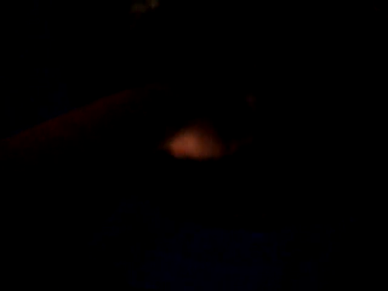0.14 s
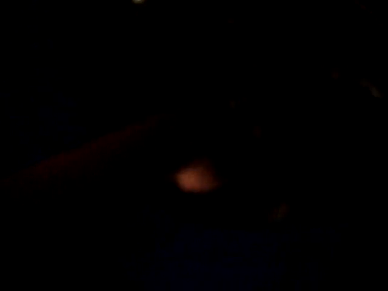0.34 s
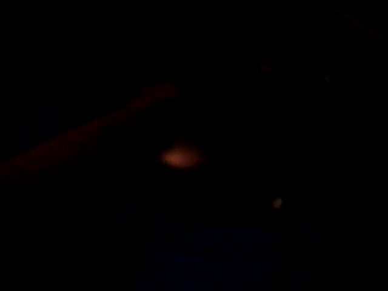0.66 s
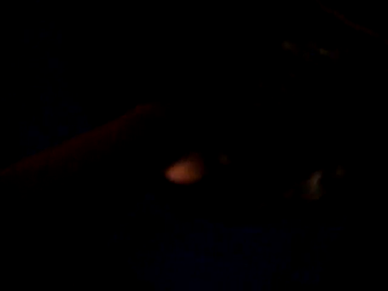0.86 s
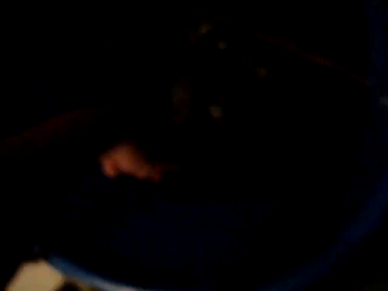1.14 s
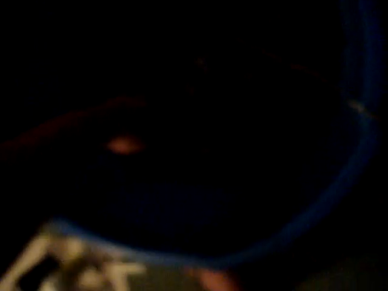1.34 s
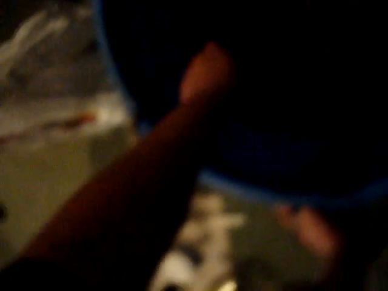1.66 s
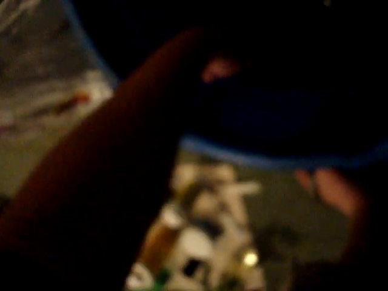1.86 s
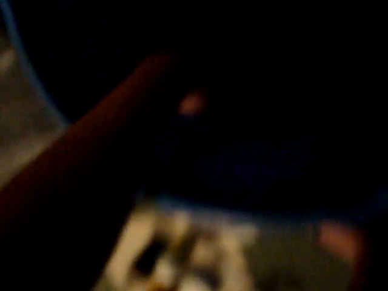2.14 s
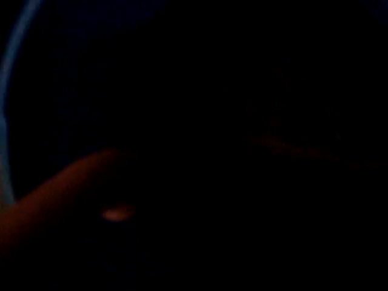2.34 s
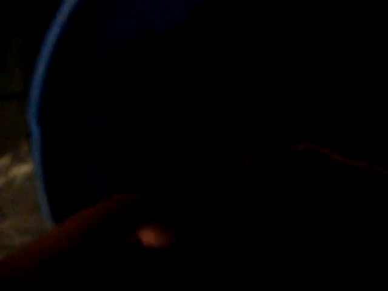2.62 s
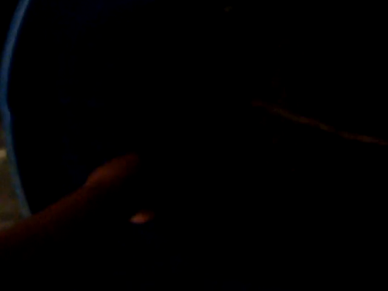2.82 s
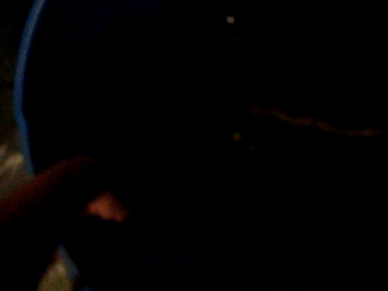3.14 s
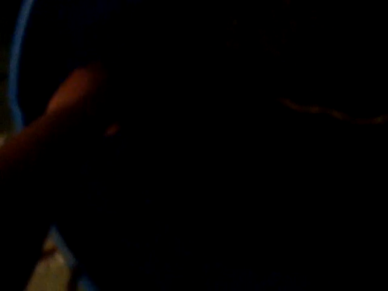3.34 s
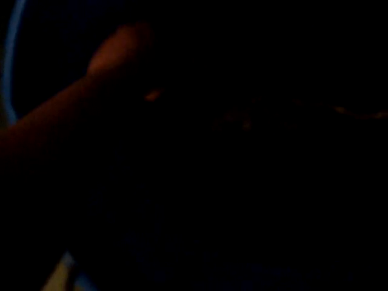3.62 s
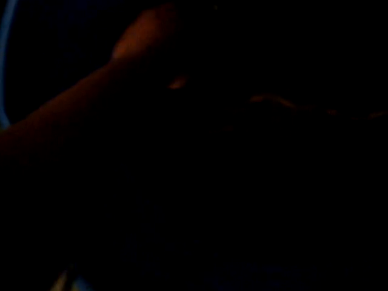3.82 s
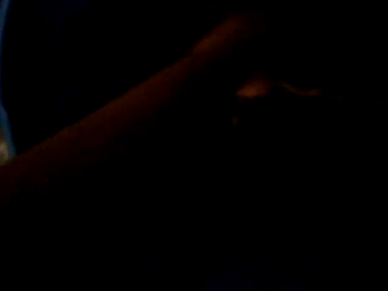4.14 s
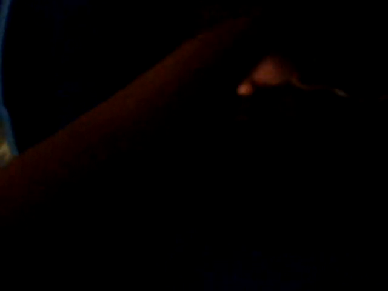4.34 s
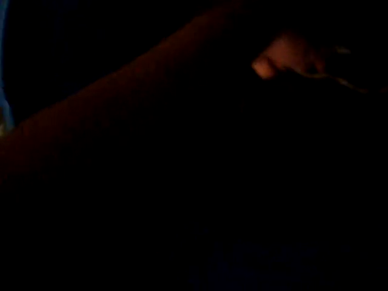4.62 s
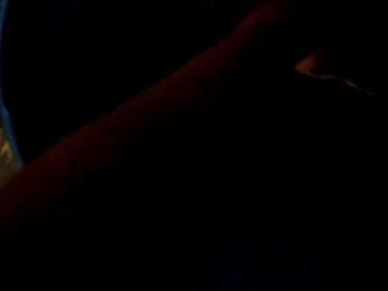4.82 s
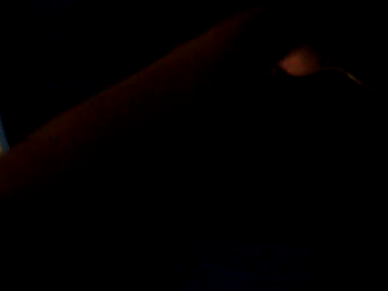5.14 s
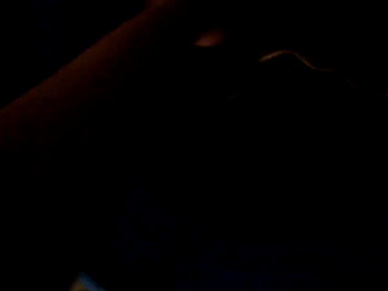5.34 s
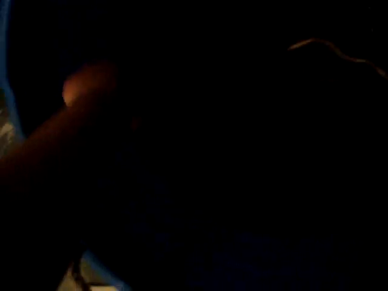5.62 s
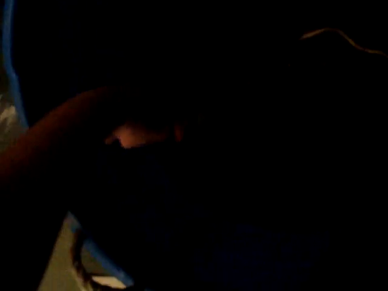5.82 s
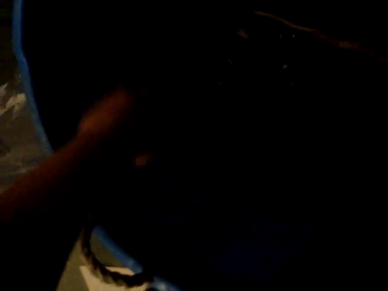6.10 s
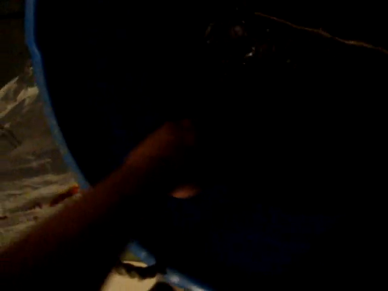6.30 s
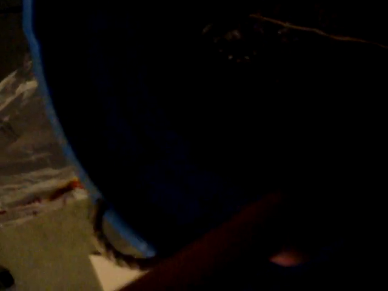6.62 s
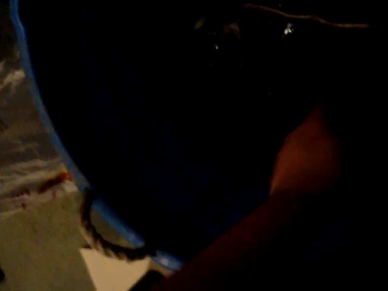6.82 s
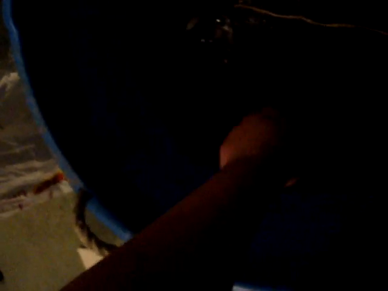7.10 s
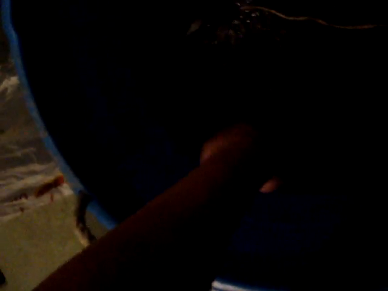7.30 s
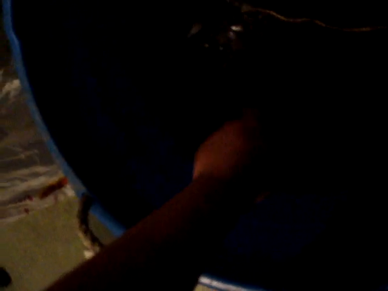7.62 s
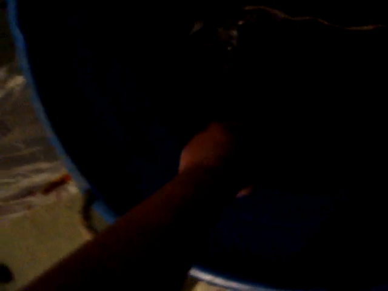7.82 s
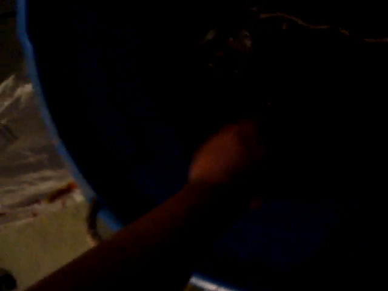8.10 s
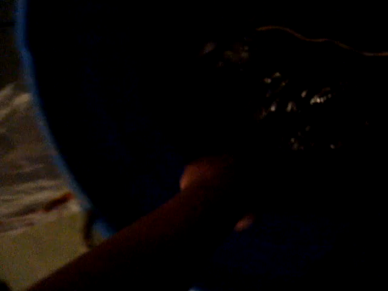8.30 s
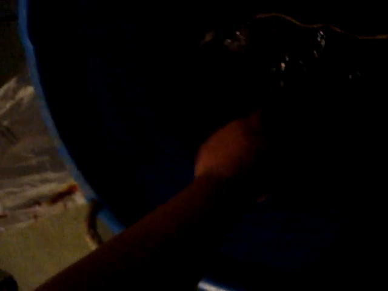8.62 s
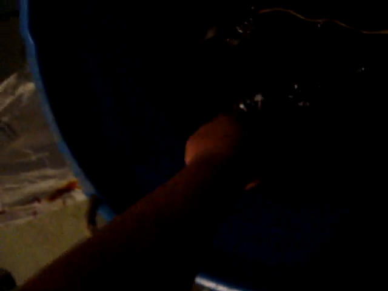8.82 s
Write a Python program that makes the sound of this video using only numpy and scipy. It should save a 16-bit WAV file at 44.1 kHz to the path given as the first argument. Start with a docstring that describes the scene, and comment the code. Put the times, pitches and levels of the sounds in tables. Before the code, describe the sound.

Water is worked by hand in a deep plastic tub, heard close with short hollow reflections. Irregular strokes gurgle, fizz and plop; wavelets slap. After a quieter passage, the wall is bumped repeatedly with woody-plastic knocks, low thuds and gulping air. A sparse pause follows, then lively, crowded sloshing over faint room air and hum.

```python
"""First a wash of stirred water, then a slap and a plop: a hand stirs a big plastic barrel, close by, in a small room.
Each stroke folds air into the water: clouds of decaying sines gurgle, splash and fizz over filtered noise.
Single bubbles plop with climbing pitch, eddies shed sweeping chains of them, wavelets slap as noise bursts.
The stirrer knocks on the wall (noise and decaying modes), trapped air gulps, and the barrel thuds on hard pushes.
Behind it lie the barrel's soft drone (resonant noise), room air and a faint mains hum."""
import sys
import numpy as np
from scipy import signal
from scipy.fft import rfft, irfft, next_fast_len
from scipy.io import wavfile
from scipy.ndimage import uniform_filter1d, map_coordinates

SR = 44100
rng = np.random.default_rng(int(sys.argv[2]) if len(sys.argv) > 2 else 0)


def log_audio(samples):
    """Write samples as a 16-bit WAV file to the path given in sys.argv[1]."""
    # one column per channel
    frames = np.atleast_2d(samples).T
    # limit to full scale, then quantise
    limited = np.clip(frames, -1, 1)
    pcm = np.round(limited * 32767).astype(np.int16)
    wavfile.write(sys.argv[1], SR, pcm)


N = 394694  # length [samples]
# Levels in the tables and settings are relative: each function adds a trim for its own source.


def amp(db):
    """Decibels to gain."""
    return 10 ** (np.asarray(db) / 20)


def unit(x):
    """Scale to rms 1."""
    return x / np.sqrt(np.mean(x ** 2) + 1e-20)


def along(points, hz):
    """Interpolate (frequency [Hz], value) points on a log frequency axis."""
    point_hz, value = np.transpose(points)
    return np.interp(np.log(hz + 1), np.log(point_hz + 1), value)


def curves(rows):
    """One value per sample for each column after the time."""
    s, *columns = np.transpose(rows)
    return [np.interp(np.arange(N) / SR, s, column) for column in columns]


def filtered(x, response):
    """Multiply the spectrum of x by a response of frequency."""
    size = next_fast_len(len(x) + SR // 2)
    spectrum = rfft(x, size) * response(np.fft.rfftfreq(size, 1 / SR))
    return irfft(spectrum, size)[:len(x)]


def resonance(f, hz, width):
    """Causal response of one mode."""
    return 1j * f * width / (hz * hz - f * f + 1j * f * width)


def band_noise(size, lo_hz, hi_hz):
    """Noise of rms 1 between two soft edges."""
    sos = signal.butter(3, [lo_hz, min(hi_hz, SR / 2 - 1)], "band", fs=SR, output="sos")
    return unit(signal.sosfilt(sos, rng.standard_normal(size)))


def wobble(rate, size=N):
    """A smooth random curve, rate knots a second."""
    knots = rng.standard_normal(int(size * rate / SR) + 4)
    return map_coordinates(knots, [np.arange(size) * rate / SR])


def add(track, s, sound):
    """Mix a sound into a track at time s."""
    start = max(round(s * SR), 0)
    part = track[start:start + len(sound)]
    part += sound[:len(part)]


def bubble(age, hz, cycles, rise, onset):
    """An air pocket rings down 40 dB over some cycles; its pitch climbs as it nears the surface."""
    turns = age * hz
    life = turns / cycles
    tone = np.sin(2 * np.pi * turns * (1 + rise * life / 2))
    return tone * np.exp(-np.log(100) * life) * (1 - np.exp(-turns / onset))


# quiet room air at the microphone: (frequency [Hz], relative density [dB per Hz])
ROOM_AIR = [(25, -32), (60, -12.5), (95, -15.5), (150, -4), (250, 2.5), (380, 0.5), (480, 6), (600, 0.5),
            (980, 4), (1500, -3), (3000, -12.5), (6000, -25), (10000, -29)]


def background():
    """Room air is noise shaped over frequency; mains hum is one steady sine."""
    air = unit(filtered(rng.standard_normal(N), lambda f: amp(along(ROOM_AIR, f))))
    hum = np.sin(2 * np.pi * 120 * np.arange(N) / SR)
    return amp(-48) * air + amp(-64.5) * hum


DRONE_WAVER_S = 0.00405  # drifting path that makes the drone's pitch waver
# the barrel's low drone while the water turns: (time [s], level [dB])
DRONE = [(0.0, -48.5), (0.6, -45), (1.5, -43.5), (1.62, -38.5), (1.79, -33.5), (1.87, -42), (1.93, -38),
         (2.06, -51), (2.15, -44), (2.25, -35.5), (2.39, -45), (2.5, -40.5), (2.8, -44), (2.94, -37),
         (3.03, -30), (3.12, -44), (4.3, -56), (5.4, -50), (5.6, -34), (5.92, -58.5), (7.5, -64),
         (8.4, -60), (8.95, -56)]


def drone():
    """Two low resonances of the barrel, kept going by the turning water and wavering with it."""
    level_db, = curves(DRONE)

    def response(f):
        return resonance(f, 247.7, 47) ** 2 + amp(-10) * resonance(f, 477, 110) ** 2

    tone = filtered(rng.standard_normal(N), response)
    path = DRONE_WAVER_S * SR * wobble(7)
    tone = map_coordinates(tone, [np.arange(N) + path], order=1)
    return amp(level_db - 6.5) * unit(tone)


# decay of the small room: (frequency [Hz], time to fall 60 dB [s])
ROOM_DECAY = [(150, 0.13), (1000, 0.57), (3000, 0.067), (10000, 0.011)]


def room(x):
    """A short diffuse tail, the top dying first; its pattern changes as hand and microphone move."""
    track = np.zeros(N)
    for start in range(0, N, SR // 5):  # a new tail five times a second
        hz, t, z = signal.stft(rng.standard_normal(SR // 3), SR, nperseg=256)
        decay = amp(-60 * t / along(ROOM_DECAY, hz)[:, None])
        tail = signal.istft(z * decay, SR, nperseg=256)[1]
        reverb = signal.fftconvolve(x[start:start + SR // 5], tail / np.linalg.norm(tail))
        add(track, start / SR + 0.00401, reverb)
    return track


def bounces(x, count):
    """Sound crosses the barrel and comes back several times, along paths that drift with the stirring."""
    n, track = np.arange(N), np.zeros(N)
    for k in range(1, count + 1):
        delay_s = k * 0.0035 + 0.000495 * wobble(3)
        track += amp(-2.0 - 10.2 * k) * map_coordinates(x, [n - delay_s * SR])
    return track


# air space above the water: (frequency [Hz], width [Hz], level [dB])
CAVITY_MODES = [(490, 21, 2), (845, 23, -4.5), (978, 30, -5), (1085, 78, -8), (1236, 40, -1)]


def barrel(x):
    """The air space above the water rings along in its resonances."""
    def response(f):
        return sum(amp(db) * resonance(f, hz, width) for hz, width, db in CAVITY_MODES)

    return x + amp(1.5) * filtered(x, response)


# hard pushes jolt the whole barrel: (time [s], level [dB])
JOLTS = [(0.815, -53), (3.242, -50), (3.495, -55), (3.77, -63), (3.988, -56), (4.725, -55), (5.335, -61),
         (5.482, -64), (5.65, -53), (5.77, -56), (6.723, -58), (7.115, -64), (8.425, -51)]


def jolts():
    """The full barrel shifts with a dull, deep thud: low noise that dies fast."""
    track, t = np.zeros(N), np.arange(SR // 4) / SR
    for s, db in JOLTS:
        fall = (1 - np.exp(-t / .003)) * amp(db + 6 - 60 * t / .08)
        add(track, s, band_noise(len(t), 25, 100) * fall)
    return track


GULP_RISE = .08  # share by which the pitch has climbed once the ring is 40 dB down
# large pockets of trapped air: (time [s], level [dB], starting pitch [Hz], ring [cycles])
GULPS = [(1.922, -33, 500, 15), (2.215, -30, 600, 24), (2.998, -23, 230, 15), (3.255, -20, 282, 12),
         (3.272, -17, 520, 20), (3.497, -27, 478, 14), (3.503, -28.5, 295, 18), (3.778, -27, 420, 13),
         (3.781, -20, 262, 11), (3.994, -21, 232, 16), (4.0, -18.5, 356, 13), (4.594, -24, 290, 11),
         (4.741, -13, 275, 10), (5.016, -30.5, 520, 16), (5.339, -20, 264, 10), (5.356, -33, 520, 16),
         (5.488, -21, 320, 8.1), (5.573, -23, 592, 16), (5.578, -27.5, 295, 13), (5.662, -26, 520, 13),
         (5.687, -21, 286, 10), (5.777, -29, 260, 10), (5.8, -26, 280, 11), (6.743, -24, 310, 8.9),
         (6.757, -28, 534, 16), (6.768, -29, 234, 9.7), (7.128, -29, 210, 16), (7.916, -28, 580, 18),
         (7.92, -28, 275, 12), (8.385, -34.5, 475, 30), (8.69, -33, 283, 12)]


def gulps():
    """A large air pocket closes and rings low for a few cycles."""
    track, t = np.zeros(N), np.arange(SR // 6) / SR
    for s, db, hz, cycles in GULPS:
        add(track, s, amp(db + 4.5) * bubble(t, hz, cycles, rise=GULP_RISE, onset=1.4))
    return track


MODE_LOSS_DB_PER_S = 173  # upper modes die this much faster for each octave over the centre


def clatter(t, centre_hz, count):
    """The crowded upper modes of the wet wall, a new set for each place struck, with a little noise."""
    place, phase, strength = rng.random((3, count))
    octaves = 2.2 * ((np.arange(count) + place) / count - .5)
    gain = amp(11.7 * strength - 4.3 * octaves ** 2)
    damping = amp(-MODE_LOSS_DB_PER_S * np.maximum(octaves, 0)[:, None] * t)
    tones = np.sin(2 * np.pi * (centre_hz * 2 ** octaves[:, None] * t + phase[:, None]))
    modes = gain @ (damping * tones)
    return amp(-2.0) * modes / np.sqrt(np.sum(gain ** 2) / 2) + amp(-4) * band_noise(len(t), 710, 3400)


PLUNGE_S, PLUNGE_FALL = .06, 0.393  # length of the run; its last pitch over the clack centre, before scatter
PLUNGE_DB, PLUNGE_LOSS_DB = -6, 12.5  # first bubble over the clack level; loss by the last


def plunge(t, centre_hz, count):
    """A knock drags air under: a quick run of bubbles, ever weaker and on the whole larger and lower."""
    run = np.zeros(len(t))
    for k, (late, size) in enumerate(rng.random((count, 2))):
        depth = (k + late) / count
        hz = centre_hz * PLUNGE_FALL ** depth * np.exp(size - .5)
        ring = bubble(t, hz, cycles=22.4, rise=.1, onset=1.2)
        add(run, depth * PLUNGE_S, amp(-PLUNGE_LOSS_DB * depth) * ring)
    return run


CRACK_DB = -4  # the wet crack of first contact, over the clack level
KNOCK_UNEVEN_DB = 3  # water slops against the wall as it rings down
KNOCK_DETUNE = 0.0355  # water leaning on the wall shifts its modes: scatter in log pitch
WALL_BEND = .05  # moving water bends the modes while they ring: share of pitch
# the stirrer hits the wall: (time [s], boom level [dB], clack level [dB], snap level [dB],
# contact length [s], clack time to fall 60 dB [s], clack centre [Hz])
KNOCKS = [(3.241, -28, -13, -16.5, 0.012, 0.2, 1347), (3.495, -41, -16.5, -12.5, .011, .12, 1403),
          (3.767, -35.5, -22, -14.5, 0.0062, .15, 1245), (3.986, -31.5, -20, -15, 0.014, .12, 1267),
          (4.587, -35.5, -23, -36, 0.0074, 0.21, 1294), (4.725, -30.5, -18, -23, .004, .1, 1352),
          (5.335, -33.5, -18.5, -28, 0.0034, 0.088, 1440), (5.482, -34.5, -18, -17, 0.01, 0.087, 1220),
          (5.652, -33.5, -21, -9, 0.007, 0.072, 1714), (5.766, -37.5, -21, -12.5, 0.0048, 0.11, 1736),
          (6.723, -32, -14, -15, 0.011, .14, 1302), (7.116, -41, -19.5, -12, 0.0065, .11, 1145),
          (7.912, -46.5, -29, -42, .003, .1, 1220), (8.433, -51, -19, -17, 0.0014, .05, 1240),
          (8.69, -51, -26, -37, .0033, .1, 1310)]
# the barrel wall: (frequency [Hz], level [dB], time to fall 60 dB [s])
WALL_MODES = [(193, -7.5, 0.32), (223, -3.5, 0.27), (247, 1, 0.29), (281.8, -0.5, 0.24), (313.3, 4.5, 0.23),
              (379, -2, 0.27), (511, 5, 0.069), (705, -8, 0.18), (805, -14, 0.28), (1030, -20, 0.59),
              (1295, 11, 0.05)]


def knocks():
    """Bending waves in the plastic: treble first and dying unevenly, the boom swelling later."""
    track, t = np.zeros(N), np.arange(SR // 2) / SR
    for s, boom_db, clack_db, snap_db, contact, clack_t60, clack_hz in KNOCKS:
        def fall(attack, t60):
            return (1 - np.exp(-t / attack)) * amp(-60 * np.maximum(t - contact, 0) / t60)

        bent = t + WALL_BEND * np.cumsum(wobble(30, size=len(t))) / SR
        snap = band_noise(len(t), 2500, 9500) * fall(attack=.0005, t60=.075)
        clack = clatter(bent, clack_hz, count=26) * fall(attack=0.00055, t60=clack_t60)
        boom = band_noise(len(t), 225, 750) * fall(attack=.011, t60=.16)
        ring = np.zeros(len(t))
        for hz, level, t60 in WALL_MODES:
            swell = amp(level + rng.normal(0, 4.2)) * fall(attack=0.04, t60=t60)
            mode_hz = hz * np.exp(KNOCK_DETUNE * rng.standard_normal())
            ring += swell * np.sin(2 * np.pi * (mode_hz * bent + rng.random()))
        touch = .9 + .5 * np.exp(-t / .004)  # the first touch is the hardest
        uneven = amp(KNOCK_UNEVEN_DB * wobble(130, size=len(t)) * (1 - np.exp(-t / .015)))
        crack = band_noise(len(t), 1100, 7000) * amp(clack_db + CRACK_DB - 60 * t / .012)
        hard = crack + touch * uneven * (amp(snap_db - 16.0) * snap + amp(clack_db - 1.0) * clack)
        deep = amp(boom_db + 7.0) * (boom + 0.56 * ring)
        dragged_air = amp(clack_db + PLUNGE_DB) * plunge(t, clack_hz, count=7)
        add(track, s, hard + deep + dragged_air)
    return track


# wavelets slap shut, and at 7.09 s air gulps down as a burst: (time [s], level [dB], centre [Hz], time to fall
# 60 dB [s])
SLAPS = [(0.116, -20, 2250, .1), (0.539, -12.5, 993, 0.11), (0.8, -15, 1700, 0.055),
         (0.814, -14.5, 950, 0.073), (1.109, -13, 3230, 0.066), (1.92, -11, 2780, 0.059),
         (2.218, -25, 800, 0.08), (2.603, -26, 2560, .08), (3.644, -24, 2400, .025),
         (3.721, -23, 1400, .015), (4.052, -22, 2300, .03), (4.119, -17, 1280, .03),
         (4.14, -14, 1500, 0.082), (4.234, -18, 1320, .05), (4.397, -22, 1700, 0.093),
         (4.533, -25, 1390, .04), (4.927, -19.5, 2150, 0.21), (5.012, -15.5, 1490, 0.045),
         (7.09, -10.5, 1360, 0.049), (8.095, -14.5, 1730, .1), (8.337, -18, 1490, .06),
         (8.349, -14, 1600, 0.027), (8.421, -8, 3200, 0.021), (8.439, -8, 1180, 0.047),
         (8.847, -16, 1320, 0.056), (8.911, -16, 3700, 0.029), (8.937, -11, 1390, 0.034)]


def slaps():
    """A wavelet closes with a short wet crack: two bands of dying noise."""
    track, t = np.zeros(N), np.arange(SR // 10) / SR
    for s, db, hz, t60 in SLAPS:
        smack = band_noise(len(t), hz * 0.62, hz * 1.61) * amp(-60 * t / t60)
        crack = band_noise(len(t), 2400, 8300) * amp(-60 * t / 0.02)
        add(track, s, amp(db - 7.0) * (smack + amp(-4.0) * crack))
    return track


SWIRL_GAP_S = .006  # mean wait between the bubbles of a chain
# eddies shed chains of bubbles: (time [s], length [s], level [dB], first pitch [Hz], last pitch [Hz])
SWIRLS = [(0.592, 0.057, -34, 1240, 820), (0.804, 0.033, -28.5, 1140, 746), (1.17, 0.036, -33, 885, 1000),
          (3.681, 0.046, -30, 980, 1360), (3.816, 0.034, -27.5, 1390, 820), (3.939, 0.033, -26, 1230, 1700),
          (4.047, 0.039, -42, 2090, 1300), (4.135, 0.038, -31, 1900, 1060), (4.232, 0.03, -34, 1700, 930),
          (4.393, 0.024, -29, 1620, 880), (5.011, 0.075, -30.5, 1440, 1130),
          (5.772, 0.024, -21, 1580, 2100), (7.054, 0.035, -22, 3660, 1600), (7.092, 0.025, -25, 1350, 846),
          (7.121, 0.05, -33, 840, 805), (7.533, 0.015, -22.5, 1560, 2200), (7.622, 0.067, -25, 1480, 1740),
          (7.704, 0.031, -30.5, 1230, 940), (7.775, 0.022, -26.5, 1350, 856), (7.852, 0.05, -27, 1280, 960),
          (8.311, 0.053, -29, 1380, 980), (8.454, 0.031, -21.5, 904, 1460), (8.66, 0.037, -19.5, 2300, 970),
          (8.698, 0.016, -18, 766, 1070), (8.847, 0.038, -31, 1320, 1670)]


def swirls():
    """An eddy sheds overlapping bubbles whose size drifts, so that the chain sweeps in pitch."""
    track, t = np.zeros(N), np.arange(SR // 20) / SR
    chances = rng.standard_normal((len(SWIRLS), 32, 3))
    for (s, length, db, from_hz, to_hz), chance in zip(SWIRLS, chances):
        for age, (late, size, strength) in zip(np.arange(0, length, SWIRL_GAP_S), chance):
            hz = from_hz * (to_hz / from_hz) ** (age / length) * np.exp(0.029 * size)
            ring = bubble(t, hz, cycles=15.2, rise=0.075, onset=0.92)
            add(track, s + age + 0.205 * SWIRL_GAP_S * late, amp(db + 2.1 * strength + 5) * ring)
    return track


DAUGHTER_S, DAUGHTER_SPREAD = .007, .1  # typical wait between daughters; their scatter in log pitch
DAUGHTER_DB, DAUGHTER_LOSS_DB = -0.5, 1.5  # their level before losses; loss for each in turn
RING_GROWTH = 0.021  # a stronger plop lies deeper and rings longer: share of cycles gained per dB
# the loudest single bubbles: (time [s], level [dB], nominal pitch [Hz], the ring starts a little lower)
PLOPS = [(0.146, -27, 2560), (0.326, -21.5, 2080), (0.344, -26, 1950), (0.347, -18.5, 1090),
         (0.395, -27, 2255), (0.471, -18.5, 2850), (0.557, -22, 1170), (0.563, -21, 986),
         (0.587, -35, 1227), (0.664, -23.5, 1240), (0.669, -24.5, 2500), (0.707, -26, 1600),
         (0.802, -19, 1790), (0.81, -16, 788), (0.814, -16.5, 1036), (0.827, -21, 2030), (0.862, -24, 1034),
         (0.873, -21.5, 714), (0.884, -19, 2000), (0.917, -20.5, 2340), (1.138, -22, 2130),
         (1.157, -22, 840), (1.163, -14, 940), (1.176, -21.5, 910), (1.192, -28, 890), (1.871, -21.5, 3060),
         (1.883, -27.5, 965), (1.92, -25, 3570), (1.947, -18.5, 2020), (2.072, -23.5, 3850),
         (2.102, -25, 1294), (2.237, -27, 1305), (2.249, -24, 1950), (2.343, -25, 3400),
         (2.603, -19.5, 2610), (3.025, -19, 1396), (3.196, -25, 1490), (3.518, -21, 1940),
         (3.595, -26, 2400), (3.619, -26, 2070), (3.641, -25, 2530), (3.717, -28, 1270), (3.814, -23, 1430),
         (3.938, -28, 1145), (4.052, -21.5, 2700), (4.079, -28.5, 833), (4.118, -24, 1290),
         (4.138, -23, 1270), (4.195, -31, 624), (4.232, -20.5, 2050), (4.236, -26.5, 960),
         (4.291, -22, 3410), (4.4, -24, 2950), (4.417, -23, 2220), (4.531, -26, 1130), (4.535, -23, 1600),
         (4.725, -14, 1374), (4.732, -22, 722), (4.863, -18.5, 2400), (4.884, -31, 926), (4.982, -25, 2300),
         (5.011, -22, 2550), (5.168, -28, 2100), (5.335, -21, 660), (5.534, -31, 1250), (5.559, -23, 2500),
         (5.593, -23, 2080), (5.772, -29, 940), (5.774, -14.5, 1900), (6.256, -16, 2420),
         (6.283, -18, 2490), (6.331, -31, 1250), (6.35, -26, 2860), (6.906, -32.5, 3900), (6.94, -34, 3050),
         (7.02, -22.5, 1830), (7.091, -16.5, 1170), (7.192, -31.5, 1960), (7.276, -28, 1400),
         (7.431, -28, 2320), (7.444, -25, 1500), (7.552, -23.5, 2260), (7.586, -28, 1060),
         (7.666, -22.5, 1600), (7.699, -22, 1274), (7.769, -20.5, 1440), (7.789, -26, 2770),
         (7.905, -24, 1240), (7.926, -19.5, 980), (7.937, -25, 1310), (7.941, -19.5, 4070),
         (8.007, -25, 850), (8.03, -21, 2800), (8.095, -21, 1660), (8.125, -25.5, 806), (8.135, -14, 2660),
         (8.307, -24, 1390), (8.336, -20, 2067), (8.347, -19, 925), (8.444, -15.5, 926),
         (8.486, -22.5, 1560), (8.56, -25.5, 930), (8.564, -23, 1290), (8.61, -23, 1930), (8.614, -24, 880),
         (8.628, -23, 1560), (8.639, -24, 1100), (8.636, -22.5, 2540), (8.697, -14.5, 783),
         (8.867, -17, 1440), (8.88, -22, 1570), (8.887, -18, 1020), (8.893, -22, 2500),
         (8.909, -15.5, 3920), (8.925, -21, 2540), (8.932, -18, 1150)]


def plops(rows, count=2):
    """A big bubble pinches off and rings, small ones for more cycles; a few daughters split from it."""
    track, t = np.zeros(N), np.arange(SR // 10) / SR
    chances = rng.standard_normal((len(rows), count + 1, 2))
    for (s, db, hz), chance in zip(rows, chances):
        cycles = 21 * (hz / 1000) ** 0.23 * np.exp(RING_GROWTH * (db + 23) + 0.17 * chance[0, 0])
        rise = 0.11 * np.exp(0.6 * chance[0, 1])
        add(track, s, amp(db + 8.0) * bubble(t, hz * 0.9665, cycles, rise, onset=1.32))
        for k, (late, size) in enumerate(chance[1:], 1):
            ring = bubble(t, hz * np.exp(DAUGHTER_SPREAD * size), cycles, rise=0.3, onset=1.05)
            wait = k * DAUGHTER_S * np.exp(0.39 * late)
            add(track, s + wait, amp(db + DAUGHTER_DB - DAUGHTER_LOSS_DB * k) * ring)
    return track


STRAY_PER_S, STRAY_LO_HZ, STRAY_HI_HZ = 12, 800, 3210  # mean rate; range of nominal pitch
STRAY_DB, STRAY_SPREAD_DB = -32, 3  # level in a slosh of middling strength; scatter either way
STRAY_TILT_DB = 11.5  # the smallest bubble this far over the largest
MIDDLING_DB, STRAY_GROWTH = -36, .7  # level of such a slosh; dB gained for each dB over it


def stray_plops():
    """Lesser bubbles for plops(), shed at random: the harder the push, the more and the louder."""
    splash_db = slosh_db(0, 0.95)
    shed = np.cumsum(amp(splash_db))
    when, size, strength = rng.random((int(STRAY_PER_S * N / SR), 3)).T
    at = np.searchsorted(shed, when * shed[-1])
    db = STRAY_DB + STRAY_GROWTH * (splash_db[at] - MIDDLING_DB) + STRAY_SPREAD_DB * (2 * strength - 1)
    db = db + STRAY_TILT_DB * (size - .5)
    return np.column_stack([at / SR, db, STRAY_LO_HZ * (STRAY_HI_HZ / STRAY_LO_HZ) ** size])


SLOPE_DB = 20  # a slosh climbs this far over its swell and falls this far over its ebb
LINGER_DB, LINGER_S = -23.5, 1.37  # bubbles that go on bursting: level over the crest, ebb
# one slosh for each push through the water:
# (crest time [s], level [dB], swell [s], ebb [s], brightness [dB])
SLOSHES = [(0.061, -33.5, 0.2, 0.07, -2), (0.121, -31.0, 0.03, 0.1, -3), (0.295, -33, 0.18, 0.17, -1.5),
           (0.453, -27.0, 0.1, 0.16, 0.5), (0.57, -27.5, 0.08, 0.07, -4.5), (0.661, -33.5, 0.03, 0.3, -2),
           (0.807, -22, 0.025, 0.07, 1.5), (0.885, -24.0, 0.05, 0.09, -1), (1.099, -31, 0.12, 0.28, -3.5),
           (1.683, -41.0, 0.05, 0.068, 5), (1.871, -30, 0.073, 0.082, 3.5),
           (1.934, -29.5, 0.022, 0.06, -6.5), (2.101, -32, 0.14, 0.098, -3.5),
           (2.249, -31.5, 0.041, 0.04, -4.5), (2.345, -37.5, 0.05, 0.027, -5),
           (2.44, -39, 0.12, 0.054, -1.5), (2.646, -35, 0.28, 0.18, -2.5), (2.719, -33.5, 0.15, 0.18, -4.5),
           (2.78, -33.5, 0.04, 0.15, -2), (2.98, -28.0, 0.059, 0.11, -1.5), (3.113, -34.5, 0.03, 0.12, 0.5),
           (3.196, -34.5, 0.0163, 0.4, -4), (3.361, -32, 0.25, 0.035, 0), (3.595, -32, 0.09, 0.14, -2),
           (3.706, -31.5, 0.04, 0.07, -4.5), (3.855, -35, 0.17, 0.14, -3.5), (3.955, -31, 0.055, 0.031, -1),
           (4.059, -29.5, 0.13, 0.085, -4), (4.147, -30.5, 0.04, 0.07, -4.5),
           (4.25, -31.5, 0.085, 0.17, -1), (4.417, -30, 0.032, 0.05, -1.5),
           (4.538, -31.5, 0.089, 0.027, -5), (4.659, -33, 0.09, 0.079, -3.5),
           (4.808, -31.5, 0.05, 0.044, -3), (4.877, -38, 0.11, 0.03, 2), (4.978, -27.5, 0.067, 0.17, -2),
           (5.243, -33.5, 0.11, 0.08, -6.5), (5.392, -39.5, 0.4, 0.16, -1), (5.51, -31.5, 0.04, 0.1, 1),
           (5.546, -29.5, 0.08, 0.15, 0), (5.58, -27.5, 0.08, 0.1, -1), (5.612, -26, 0.11, 0.032, 2.5),
           (5.69, -37, 0.0389, 0.17, -3), (5.785, -31, 0.016, 0.1, -3), (5.933, -35.5, 0.13, 0.11, -3),
           (6.251, -30.5, 0.03, 0.11, 0.5), (6.735, -30.5, 0.1, 0.13, -1), (7.07, -28.5, 0.115, 0.08, -1),
           (7.28, -37.5, 0.018, 0.064, -4.5), (7.35, -35, 0.04, 0.08, 0.5), (7.415, -31, 0.1, 0.09, -3),
           (7.551, -33.5, 0.033, 0.26, -3.5), (7.675, -29.0, 0.16, 0.12, -2.5),
           (7.788, -32.0, 0.033, 0.31, 0.5), (7.941, -25, 0.12, 0.04, -2),
           (8.032, -24.5, 0.04, 0.037, -4.5), (8.118, -23.0, 0.05, 0.09, -1.5),
           (8.352, -26, 0.22, 0.24, -2.5), (8.44, -32, 0.015, 0.4, -2.5), (8.617, -23, 0.07, 0.17, -1),
           (8.674, -28, 0.09, 0.06, 3.5), (8.884, -23, 0.055, 0.23, 0.5)]


def slosh_db(tilt, stretch):
    """Level of one bubble size: each slosh swells, ebbs (times stretch) and lingers; tilt weighs brightness."""
    t = np.arange(0, N / SR + .01, .002)
    power = np.zeros(len(t))
    for s, db, swell, ebb, bright_db in SLOSHES:
        before, after = np.maximum(s - t, 0), np.maximum(t - s, 0)
        crest_db = db + tilt * bright_db - SLOPE_DB * before / swell
        power += amp(crest_db - SLOPE_DB * after / (ebb * stretch)) ** 2
        power += amp(crest_db + LINGER_DB - SLOPE_DB * after / LINGER_S) ** 2
    return np.interp(np.arange(N) / SR, t, 10 * np.log10(power + 1e-12))


def cloud(rate, lo_hz, hi_hz, cycles, spread_db, wash_db):
    """Many bubbles, some stronger than the rest, on a wash of noise; rms about 1."""
    chance = rng.random((int(rate * N / SR), 5))
    start = (chance[:, :1] * N).astype(int)
    hz = lo_hz * (hi_hz / lo_hz) ** chance[:, 1:2]
    strength = amp(-spread_db * np.log(np.maximum(chance[:, 2:3], .03)))
    k = np.arange(int(cycles * SR / lo_hz))
    ring_cycles = cycles * (.5 + chance[:, 3:4])
    rings = strength * bubble(k / SR, hz, ring_cycles, rise=0.16 * chance[:, 4:], onset=0.9)
    swarm = unit(np.bincount((start + k).ravel(), rings.ravel(), N)[:N])
    swarm = swarm + amp(wash_db) * band_noise(N, lo_hz, hi_hz)
    # the air folded in by a stroke is shared among the bubbles of that moment
    return swarm / np.sqrt(np.abs(uniform_filter1d(swarm ** 2, size=2200)) + 1e-6)


GURGLE_EBB, GURGLE_DULLING = 1.55, 1.26  # ebb over the splash's; dB lost per dB of brightness
REST_GURGLE_DB, REST_SPRAY_DB = -55, -55.5  # the water between pushes


def slosh():
    """Large bubbles gurgle, small ones splash, the finest fizz in quick spurts."""
    gurgle = amp(slosh_db(-GURGLE_DULLING, GURGLE_EBB) - 6.0) + amp(REST_GURGLE_DB - 6.0)
    splash = amp(slosh_db(0, 1))
    fizz = np.hypot(amp(slosh_db(0.87, 0.89) - 3.0), amp(REST_SPRAY_DB))
    spurt, mist = wobble(75), wobble(90)
    large = cloud(rate=220, lo_hz=620, hi_hz=1400, cycles=20, spread_db=3.6, wash_db=-9)
    small = cloud(rate=900, lo_hz=1330, hi_hz=3400, cycles=28, spread_db=3.9, wash_db=-8)
    tiny = cloud(rate=2400, lo_hz=3300, hi_hz=5700, cycles=22, spread_db=5.2, wash_db=-6)
    finest = cloud(rate=5000, lo_hz=5600, hi_hz=10200, cycles=18, spread_db=5, wash_db=-6)
    small = amp(.8 * spurt) * small
    tiny = amp(2.2 * spurt) * tiny
    finest = amp(1.6 * spurt + 2.4 * mist) * finest
    churn = amp(-14.0) * band_noise(N, 204, 900)
    spray = amp(0.95) * tiny + amp(-5.5) * finest
    return gurgle * (amp(-4.0) * large + churn) + amp(0.04) * splash * small + fizz * spray


def scene():
    """Water and knocks bounce around inside the barrel, then out into the room."""
    water = slosh() + plops(PLOPS) + plops(stray_plops()) + swirls() + slaps()
    direct = barrel(water + knocks() + gulps() + jolts())
    near = direct + bounces(direct, count=4)
    mix = amp(-1.5) * near + amp(-23.5) * room(near) + drone() + background()
    return mix[None]  # one microphone channel


TOP_HZ = 10200  # the recorder's band limit


def record(dry):
    """The recorder rounds off the highest peaks and cuts steeply above its band limit."""
    rounded = dry / (1 + np.abs(dry / .56) ** 6) ** (1 / 6)
    return np.array([filtered(x, lambda f: 1 / np.sqrt(1 + (f / TOP_HZ) ** 200)) for x in rounded])


dry = scene()
out = record(dry)
log_audio(out)
```